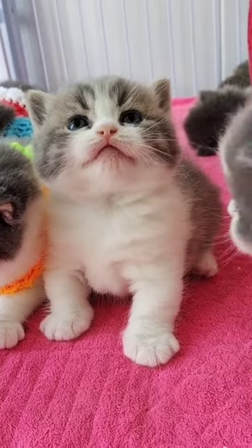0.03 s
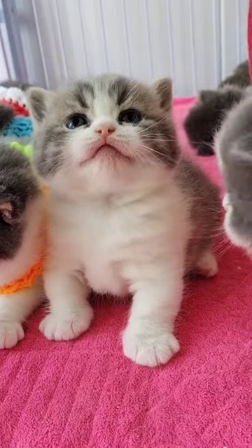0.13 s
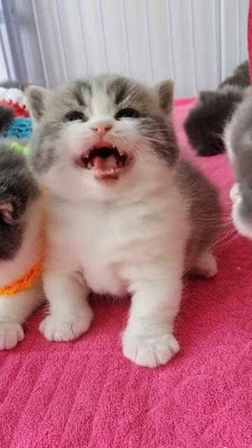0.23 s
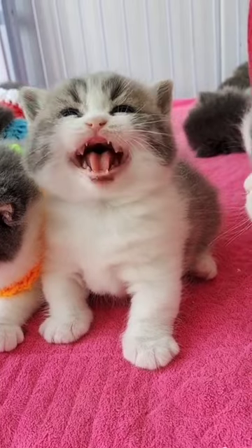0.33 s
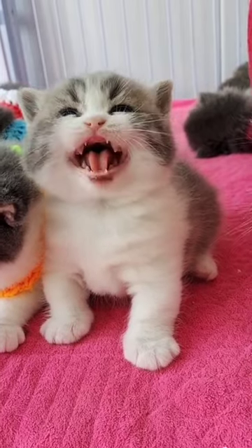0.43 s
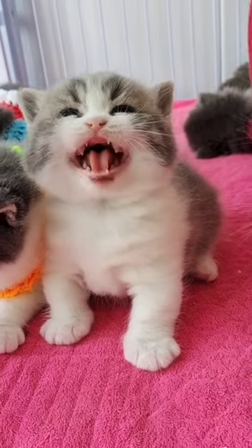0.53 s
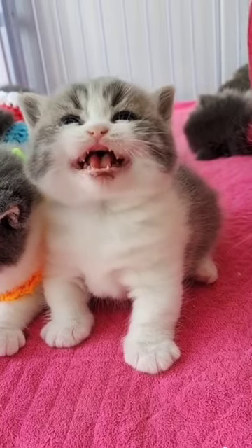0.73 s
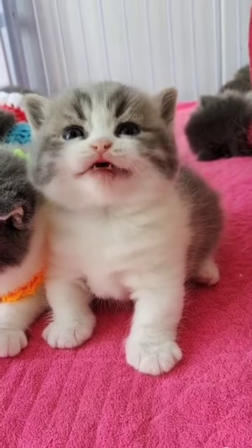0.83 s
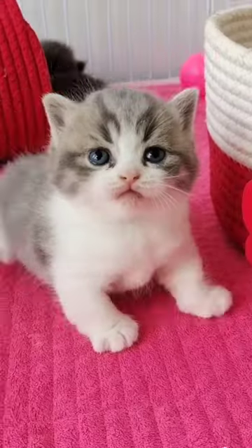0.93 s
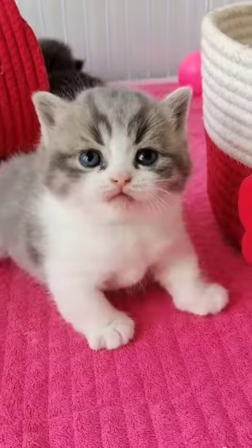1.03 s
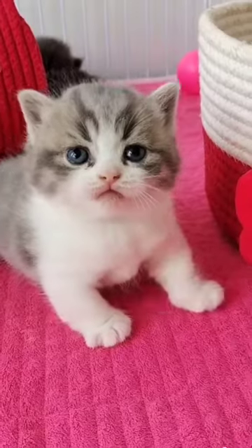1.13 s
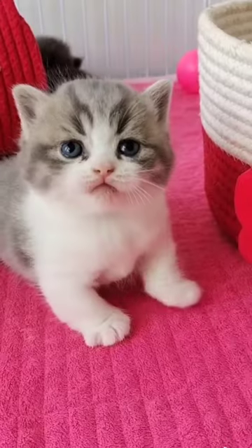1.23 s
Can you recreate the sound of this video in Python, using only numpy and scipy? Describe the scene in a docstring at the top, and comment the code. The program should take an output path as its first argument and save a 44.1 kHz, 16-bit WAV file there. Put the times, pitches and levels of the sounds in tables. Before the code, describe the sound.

A kitten gives one high meow that rises and falls, close to a stereo microphone in a small, quiet room. After a brief dip, the background hiss is louder and cloth is lightly scratched and brushed, mostly on the right.

```python
"""Faint room tone and a small smack of the lips, then one high meow: a kitten close to a stereo pair
of microphones in a small room. Its vocal folds rasp as the mouth opens, ring clear at the top of the
pitch arch, and turn dull as the pitch falls and the mouth shuts. The level dips briefly; then, over
louder room tone, cloth is scratched, brushed and softly bumped nearby, mostly on the right."""
import sys
import numpy as np
from scipy import signal
from scipy.fft import rfft, irfft, next_fast_len
from scipy.io import wavfile
from scipy.ndimage import uniform_filter1d, map_coordinates

SR = 44100
rng = np.random.default_rng(int(sys.argv[2]) if len(sys.argv) > 2 else 0)


def wav_record(signal):
    """Record a signal, one row per channel, as 16-bit PCM in the file named by sys.argv[1]."""
    frames = np.transpose(np.atleast_2d(signal))
    bounded = np.clip(frames, -1, 1)
    # unit amplitude maps onto the largest positive 16-bit level
    quanta = np.round(bounded * 32767).astype(np.int16)
    wavfile.write(sys.argv[1], SR, quanta)


N = 57330

# room tone behind the kitten and behind the cloth (frequency [Hz], relative level [dB])
KITTEN_ROOM_TONE = [(20, -1.5), (65, -1.5), (107, -13), (234, -11), (472, -17.5), (16000, -42.5)]
CLOTH_ROOM_TONE = [(20, -40), (60, 1), (100, -17.5), (250, -4.5), (450, -17), (5000, -22.5), (15000, -15.5)]
# how alike the room tone is at the two microphones (frequency [Hz], correlation [0..1])
TONE_CORRELATION = [(40, .93), (150, 0.41), (5000, 0.031)]
# decay of the small room (frequency [Hz], t60 [s])
ROOM_T60 = [(300, 0.27), (14000, 0.35)]
# narrow room resonances that ring on after the voice (frequency [Hz], width [Hz], gain [dB])
ROOM_MODES = [(455, 14, -9), (495, 25, -11), (2288, 6, -7), (2318, 5, -3), (2348, 8, -9)]

# crisp scratches on the cloth (time [s], level [dB], t60 [s])
SCRATCHES = [(.9865, -43, .03), (.99, -36, .022), (.9992, -41, .025), (1.006, -48, .1), (1.013, -46, .13),
             (1.0502, -40, .033), (1.1012, -41.5, .03), (1.112, -52, .1)]
# duller brushes over it (time [s], level [dB], rise [s], t60 [s], tilt [dB per octave])
BRUSHES = [(1.105, -55.5, 0.02, 0.53, -3), (1.239, -50, 0.0041, 0.1, 5.5), (1.251, -58, 0.0089, 0.48, 3)]
# spectra of the scratches and brushes (frequency [Hz], relative level [dB])
SCRATCH_COLOUR = [(500, -25), (3800, -25), (5400, -13), (6400, -17), (8400, -6), (9500, 4), (10500, 3),
                  (11500, 5), (13000, -4), (15000, -3.5)]
BRUSH_COLOUR = [(300, -1.5), (900, -18), (1450, 7), (2700, 8), (10200, -1), (15000, -16)]
# soft bumps (time [s], level [dB], frequency [Hz])
BUMPS = [(1.101, -59.5, 66.4), (1.152, -57.5, 290), (1.203, -58.5, 191.7), (1.238, -60, 75)]
# how each source is heard at the two microphones, the left one duller in the high treble (frequency [Hz], left
# minus right [dB])
CLOTH_BALANCE = [(60, -2), (240, -12.5), (950, -2), (3770, 0), (15000, -8.5)]
KITTEN_BALANCE = [(2500, -1), (9500, 0.5), (11000, -13)]

# faint smacks of lips and tongue (time [s], level [dB], t60 [s])
SMACKS = [(.163, -61, .02), (.171, -59, .15), (.679, -65, .05)]
# air hissing through the mouth (time [s], level [dB])
BREATH_LEVEL = [(.155, -100), (.172, -69), (.195, -61), (.22, -47.5), (.28, -49), (.35, -70), (.65, -70),
                (.69, -61), (.85, -95)]
# spectra of that breath and of the rasp in the throat (frequency [Hz], relative level [dB])
BREATH_COLOUR = [(400, -19.5), (2100, 11.5), (3200, -17), (4600, -3), (7000, 13), (8500, 2.5), (10000, 6.5),
                 (16000, 1)]
RASP_COLOUR = [(700, -39), (2000, 5.5), (2600, 10.5), (3600, -10.5), (8000, -25)]
# raggedness of the vocal folds (time [s], jitter [share of the pitch])
JITTER = [(.19, 0.036), (.25, 0.033), (.29, .011), (.32, 0.003), (.41, 0.0005), (.52, 0.001), (.68, 0.0056),
          (.785, 0.03), (.805, .015)]
# the arch of the meow (time [s], pitch [Hz])
MEOW_PITCH = [(.19, 735), (.205, 828), (.22, 960), (.25, 1128), (.3, 1282), (.345, 1343), (.385, 1381),
              (.435, 1380), (.5, 1295), (.56, 1244), (.607, 1164), (.64, 1160), (.7, 1057), (.755, 865),
              (.778, 645), (.802, 515), (.815, 455)]
# strength of the voice (time [s], level [dB])
VOICE_EFFORT = [(.196, -53.5), (.207, -53.5), (.23, -54.5), (.28, -45.5), (.335, -41), (.43, -42.5),
                (.49, -42), (.648, -46.5), (.663, -54), (.687, -47), (.755, -46), (.785, -50.5),
                (.806, -52)]
# resonances of throat and mouth, and the uneven levels of the highest harmonics (frequency [Hz], gain [dB])
THROAT_GAIN = [(500, 3), (700, -9), (1000, -1), (1350, 0.5), (2750, 7.5), (3200, -39), (3700, -6),
               (4080, 6.5), (4600, -3), (5500, -8.5), (6900, -9.5), (7750, -17), (8300, -17.5),
               (11000, -20.5), (12100, -22.5), (13000, -9), (14300, -11.5), (15300, -16)]
# second harmonic against the voice's strength (time [s], gain [dB])
SECOND_HARMONIC = [(.2, 8), (.235, 8), (.28, 0), (.5, 5), (.555, 10), (.58, 9), (.595, 4), (.612, 11),
                   (.624, -2), (.645, 12), (.68, 1.5), (.7, -9), (.745, -13), (.758, 2), (.785, -2.5),
                   (.81, -17)]
# harmonics from the third up, which only an open mouth lets out (time [s], gain [dB])
MOUTH_TREBLE = [(.198, -14), (.225, 6), (.27, 6), (.35, 3), (.43, 3.5), (.48, -2.5), (.58, -4.5),
                (.63, -14.5), (.665, -32.5)]

DIP_START_S, DIP_END_S = 0.965, 0.983
KITTEN_TONE_DB, CLOTH_TONE_DB = -68, -60
WALLS_DB, KITTEN_REVERB_DB, CLOTH_REVERB_DB = -23, -10.5, -15.5
CLICK_RISE_S = 0.0027  # scratches and smacks
GLIDE_S, QUAVER_SHARE, SHIMMER_DB, FLUTTER_DB = .022, 0.0018, 0.5, .3
JITTER_PER_S, QUAVER_PER_S, SHIMMER_PER_S, FLUTTER_PER_S = 650, 130, 180, 45
TIME = np.arange(N) / SR


def amp(db):
    """Decibels to gain."""
    return 10 ** (np.asarray(db) / 20)


def unit(x):
    """Scale to rms 1."""
    return x / np.sqrt(np.mean(x ** 2) + 1e-20)


def along(points, hz):
    """Read (frequency, value) points on a log axis."""
    freqs, values = np.transpose(points)
    return np.interp(np.log(hz + 1), np.log(freqs + 1), values)


def curve(points):
    """Read (time, value) points at every sample."""
    return np.interp(TIME, *np.transpose(points))


def wobble(per_s):
    """A smooth random curve with per_s knots a second."""
    return map_coordinates(rng.standard_normal(N // 4), [TIME * per_s], mode="wrap")


def burst(start, rise, t60):
    """An envelope that rises straight and dies away."""
    age = TIME - start
    return np.clip(age / rise, 0, 1) * amp(-60 * np.maximum(age - rise, 0) / t60)


def filtered(x, response):
    """Pass x through a complex frequency response."""
    size = next_fast_len(N + SR // 2)
    return irfft(rfft(x, size) * response(np.fft.rfftfreq(size, 1 / SR)), size)[..., :N]


def resonance(hz, centre_hz, width_hz):
    """Response of one causal resonance, 1 at its centre."""
    return 1j * hz * width_hz / (centre_hz ** 2 - hz ** 2 + 1j * hz * width_hz)


def hiss(colour):
    """Coloured mono noise, rms 1."""
    return unit(filtered(rng.standard_normal(N), lambda hz: amp(along(colour, hz))))


def placed(x, balance):
    """Set a source between the microphones by a level difference at each frequency."""
    return filtered(x, lambda hz: amp(np.array([[.5], [-.5]]) * along(balance, hz)))


def room_tone(colour):
    """Steady background, rms 1: the lower the frequency, the more alike at both microphones."""
    def mid_side(hz):
        angle = np.arccos(along(TONE_CORRELATION, hz)) / 2
        return amp(along(colour, hz)) * [np.cos(angle), np.sin(angle)]
    mid, side = filtered(rng.standard_normal((2, N)), mid_side)
    return unit(np.array([mid + side, mid - side]))


def reverb(x, build_s=.007):
    """The small room's diffuse tail, different at each microphone."""
    hz, t, spectra = signal.stft(rng.standard_normal((2, SR // 2)), SR, nperseg=256)
    decay = amp(-60 * t / along(ROOM_T60, hz)[:, None])
    tail = signal.istft(spectra * decay, SR, nperseg=256)[1]
    tail *= np.minimum(np.arange(tail.shape[1]) / SR / build_s, 1)
    return signal.fftconvolve(x, tail / np.linalg.norm(tail[0]), axes=1)[:, :N]


def walls(x, count=8, latest_s=.008):
    """A few early reflections reach each microphone from the near walls."""
    delays = latest_s * rng.uniform(0.073, 1, (count, 2, 1))
    signs = rng.choice([-1, 1], (count, 2, 1))
    echoes = filtered(x, lambda hz: np.sum(signs * np.exp(-2j * np.pi * hz * delays), axis=0))
    return echoes / np.sqrt(count)


def room_modes(hz):
    """Response of the room's narrow resonances."""
    return sum(amp(db) * resonance(hz, centre, width) for centre, width, db in ROOM_MODES)


def fibres(colour, tilt_db=0, grain_db=2.5):
    """Stereo crackle of many fibres slipping with uneven strength, rms 1."""
    slips = rng.standard_normal((2, N)) * amp(grain_db * wobble(per_s=1500))
    return unit(filtered(slips, lambda hz: amp(along(colour, hz) + tilt_db * np.log2(1 + hz / 500))))


def cloth():
    """Scratches, brushes and bumps nearby, mostly on the right; a thin ring runs through the rustle."""
    scratches = fibres(SCRATCH_COLOUR)
    scratches *= sum(amp(db) * burst(start, CLICK_RISE_S, t60) for start, db, t60 in SCRATCHES)
    brushes = sum(amp(db) * burst(start, rise, t60) * fibres(BRUSH_COLOUR, tilt)
                  for start, db, rise, t60, tilt in BRUSHES)
    bumps = np.zeros(N)
    for start, db, hz in BUMPS:
        thud = np.sin(2 * np.pi * hz * (TIME - start) + wobble(hz))
        bumps += amp(db) * burst(start, rise=0.0037, t60=0.1) * thud
    direct = placed(scratches + brushes + bumps, CLOTH_BALANCE)
    ringing_tail = filtered(
        reverb(direct), lambda hz: amp(CLOTH_REVERB_DB) + resonance(hz, centre_hz=9530, width_hz=130))
    return direct + ringing_tail


def smacks():
    """Lips and tongue part with short, bright ticks of noise."""
    noise = filtered(rng.standard_normal(N), lambda hz: resonance(hz, centre_hz=4330, width_hz=5000))
    return unit(noise) * sum(amp(db) * burst(start, CLICK_RISE_S, t60) for start, db, t60 in SMACKS)


def rasp(gain_db=24.5):
    """Turbulence in the throat, strong where the voice is ragged: as it starts and as it collapses."""
    return amp(gain_db) * curve(JITTER) * hiss(RASP_COLOUR)


def meow(on_s=.19, off_s=.817, ramp_s=.01, count=18):
    """Vocal fold harmonics sweep through the throat's resonances; the closing mouth leaves only two."""
    pitch = uniform_filter1d(curve(MEOW_PITCH), int(GLIDE_S * SR) + 1)
    pitch *= 1 + QUAVER_SHARE * wobble(QUAVER_PER_S)
    ragged_pitch = pitch * (1 + curve(JITTER) * wobble(JITTER_PER_S))
    phase = 2 * np.pi * np.cumsum(ragged_pitch) / SR
    treble_db = curve(MOUTH_TREBLE)
    harmonics = np.zeros(N)
    for k in range(1, count + 1):
        hz = k * pitch
        db = curve(SECOND_HARMONIC) if k == 2 else along(THROAT_GAIN, hz) + treble_db * (k > 2)
        flutter_db = k * FLUTTER_DB * wobble(FLUTTER_PER_S)  # higher harmonics flutter more
        harmonics += amp(db + flutter_db) * (hz < SR / 2) * np.sin(k * phase)
    voice = np.sqrt(2) * harmonics + rasp()
    gate = np.clip(np.minimum(TIME - on_s, off_s - TIME) / ramp_s, 0, 1)
    return voice * gate * amp(curve(VOICE_EFFORT) + SHIMMER_DB * wobble(SHIMMER_PER_S))


def kitten(left_lag_s=0.00017):
    """Smacks, meow and breath close to the pair and a little to the right, with the room's answer."""
    breath = hiss(BREATH_COLOUR) * amp(curve(BREATH_LEVEL))
    pair = placed(smacks() + meow() + breath, KITTEN_BALANCE)
    direct = filtered(pair, lambda hz: np.exp(1j * np.pi * hz * left_lag_s * np.array([[-1], [1]])))
    ring = filtered(pair, room_modes)
    return direct + ring + amp(WALLS_DB) * walls(pair) + amp(KITTEN_REVERB_DB) * reverb(pair)


def fader(inside_s, fade_s=0.0022, floor=.04):
    """A quick fade between a low floor and full gain."""
    return np.clip(inside_s / fade_s, floor, 1)


def scene():
    """First the kitten, then the cloth, each over its own room tone, with a brief dip between."""
    kitten_part = kitten() + amp(KITTEN_TONE_DB) * room_tone(KITTEN_ROOM_TONE)
    cloth_part = cloth() + amp(CLOTH_TONE_DB) * room_tone(CLOTH_ROOM_TONE)
    return kitten_part * fader(DIP_START_S - TIME) + cloth_part * fader(TIME - DIP_END_S)


def record(dry):
    """Both microphone channels stop at 15.7 kHz."""
    return filtered(dry, lambda hz: hz < 15700)


dry = scene()
out = record(dry)
wav_record(out)
```